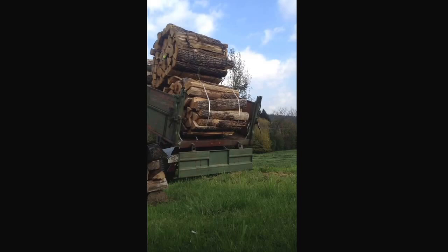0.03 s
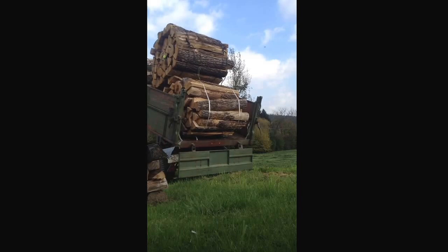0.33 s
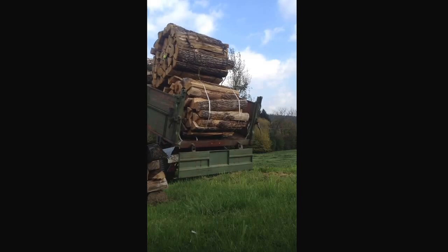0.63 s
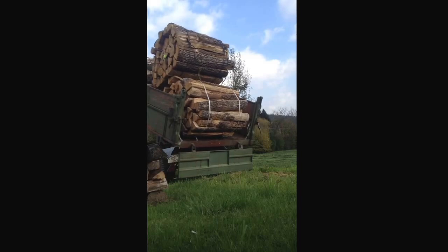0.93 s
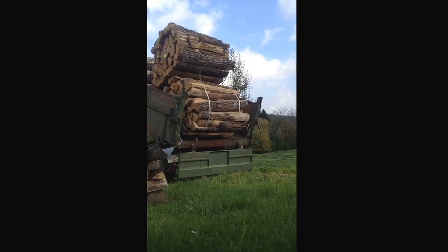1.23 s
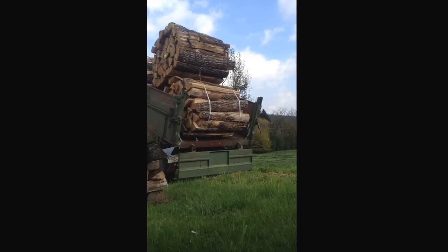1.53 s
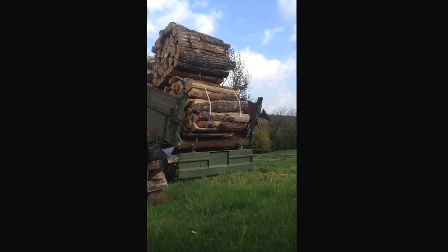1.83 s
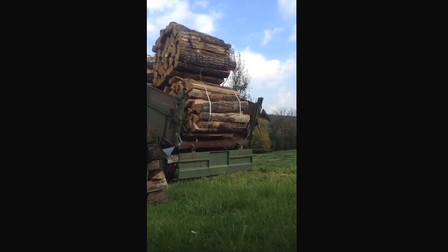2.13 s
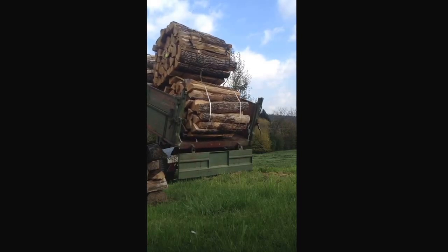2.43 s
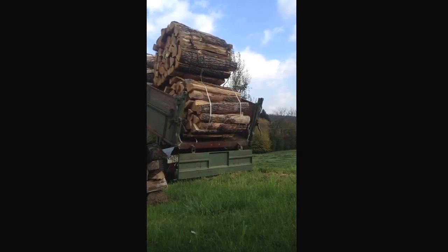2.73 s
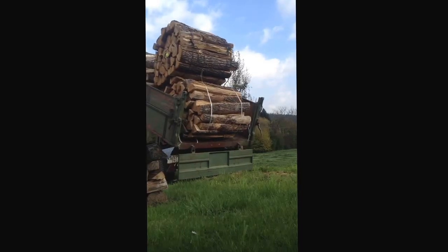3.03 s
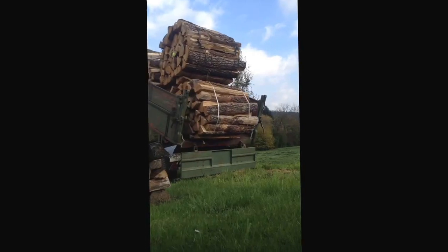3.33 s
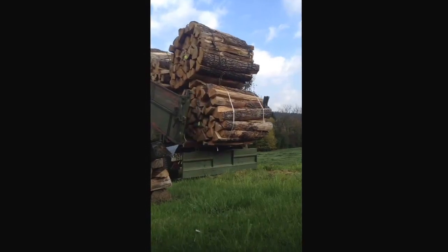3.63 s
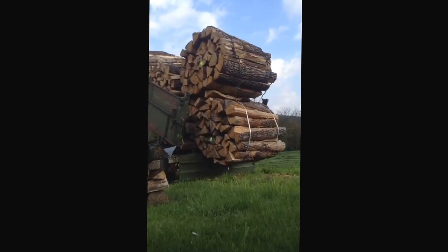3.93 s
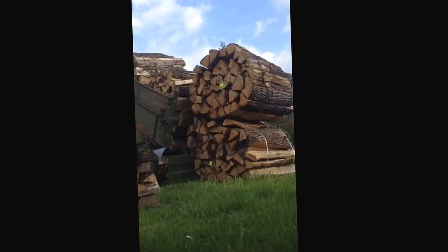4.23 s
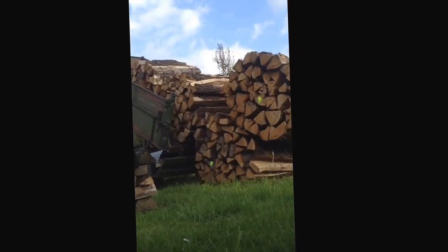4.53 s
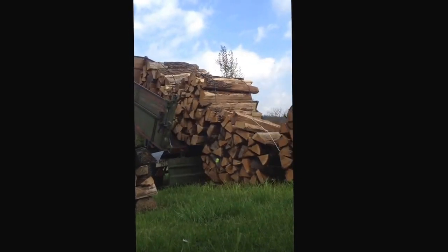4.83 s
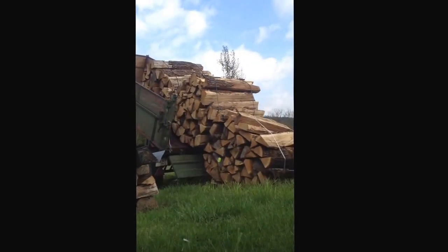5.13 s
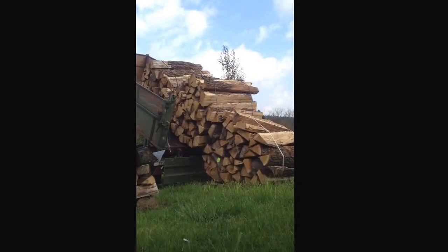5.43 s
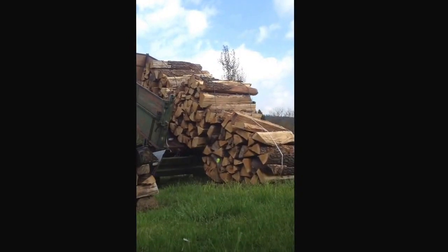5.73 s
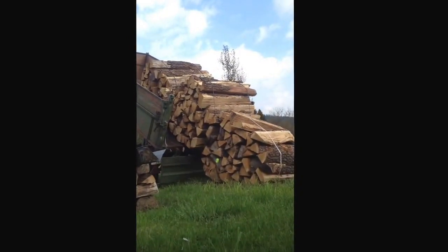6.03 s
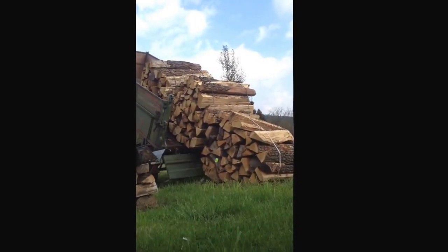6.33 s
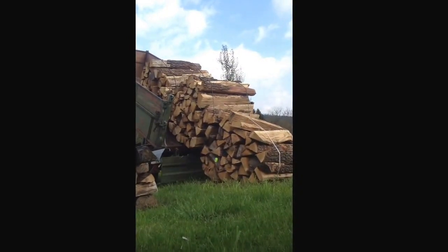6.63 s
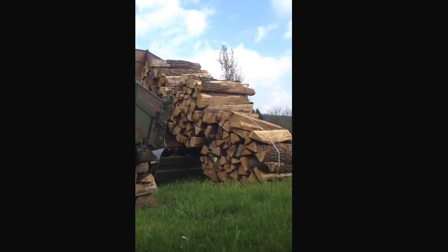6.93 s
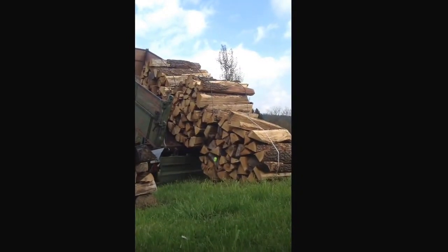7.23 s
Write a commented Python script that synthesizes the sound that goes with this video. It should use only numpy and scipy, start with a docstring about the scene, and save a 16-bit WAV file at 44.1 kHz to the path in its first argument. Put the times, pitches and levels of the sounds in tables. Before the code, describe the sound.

A tractor idles with a low, rattling hum in an open field. Bundles of firewood creep down a tipping steel trailer in small jerks, knocking and crackling. A sharp snap and a short scraping squeal set the load loose, and two bundles crash onto the grass in a loud, hollow clatter with splinters and dull thuds. The pile settles with scattered knocks and one last crack. The sound is dry, from one nearby microphone.

```python
"""A tractor idles in a field while its trailer tips bundles of split firewood onto the grass.
Three cylinders thump and rattle under the rush of the fan. The load creeps in jerks, knocking on the
steel bed and tearing bark, then breaks loose with a snap and a stick-slip squeal. Two bundles crash
down in a clatter of ringing logs, splinters and turf thuds; the pile settles and one last piece snaps."""
import sys
import numpy as np
from scipy import signal
from scipy.fft import rfft, irfft
from scipy.io import wavfile
from scipy.ndimage import uniform_filter1d

SR = 44100
rng = np.random.default_rng(int(sys.argv[2]) if len(sys.argv) > 2 else 0)


def wav_out(sig):
    """Save sig, one row per channel (or a flat mono array), as 16-bit PCM at SR to the path in sys.argv[1]."""
    wavfile.write(sys.argv[1], SR, np.round(np.clip(np.atleast_2d(sig).T, -1, 1) * 32767).astype(np.int16))


N = 321489
TIME = np.arange(N) / SR
HIT = TIME[:SR // 4]  # time axis of one hit

# jerks of the creeping load: t/s, knock peak/dB, crackle peak/dB, crackle swell/s
LOAD_SLIPS = [(0.028, -24.5, -30, 0.0047), (0.348, -25, -24.5, 0.0024), (0.362, -41, -21.5, 0.0021),
              (0.372, -23.5, -40, 0.0059), (0.651, -25.5, -30, 0.0046), (0.832, -31.5, -51, 0.0033),
              (0.915, -28, -27.5, 0.0027), (1.064, -29.5, -45, 0.0033), (1.184, -26, -26.5, 0.002),
              (1.371, -31, -47, .004), (1.484, -26.5, -27, 0.004), (1.543, -32.5, -37, .003),
              (1.991, -27, -46, .004), (2.003, -28.5, -28, 0.0031), (2.125, -28.5, -47, .002),
              (2.202, -28, -29, 0.0035), (2.291, -27.5, -30.5, 0.0032), (2.323, -29.5, -32, 0.0044),
              (2.414, -26.5, -31.5, 0.011), (2.519, -31, -34, 0.0062), (2.663, -26.5, -33, 0.0043),
              (2.767, -29.5, -39.5, 0.0055), (2.851, -43, -39, .003), (2.867, -31.5, -30, 0.0017),
              (2.95, -30, -31.5, 0.011), (2.964, -37, -34, .004), (2.978, -30, -27.5, 0.011),
              (3.002, -23, -31, .004), (3.014, -22, -21, 0.0044), (3.029, -24.5, -29, 0.0017),
              (3.138, -34, -25.5, .005), (3.18, -33, -24, 0.0039), (3.44, -34.5, -33.5, 0.0024),
              (3.739, -29, -22, 0.0045), (3.825, -46, -24.5, 0.0073), (3.886, -45, -24, 0.0047),
              (4.226, -24, -15.5, 0.014), (4.38, -31, -26, 0.0014), (6.079, -35, -59, 0.0038),
              (6.298, -49, -36.5, 0.0019), (7.244, -32, -43.5, 0.0077)]
# hollow tone of logs knocking together: f/Hz, level/dB
CLATTER_SPECTRUM = [(130, -34.5), (220, -7.5), (321, -5), (356, -0.5), (420, -3), (456, -2), (519, 3.5),
                    (602, -3), (809, -1), (1170, -18), (2000, -21.5), (2600, -14), (4400, -120)]
# bright tone of tearing bark and fibres: f/Hz, level/dB
BARK_SPECTRUM = [(100, -45), (590, -19), (1000, 3.5), (1290, -28), (1580, 1), (2130, -8.5), (2590, 4),
                 (3410, -11.5), (4440, -4.5), (5520, -2.5), (6950, -1), (9580, -8.5), (13500, -9),
                 (15500, -27)]
# dry tone of breaking chips: f/Hz, level/dB
SPLINTER_SPECTRUM = [(100, -51), (760, -22), (1300, -6.5), (1550, -5), (1950, -7), (2520, 1), (3140, -10),
                     (3480, -10.5), (3820, -9), (4610, -6.5), (5110, -13), (7120, -6.5), (9720, -14),
                     (11400, -13), (13500, -16), (15500, -27)]


def undb(db):
    """Decibels to gain."""
    return 10 ** (np.asarray(db) / 20)


def unit(x):
    """Scale to rms 1."""
    return x / np.sqrt(np.mean(x ** 2))


def peak(x, db):
    """Scale so that the loudest few milliseconds have this level."""
    return x * undb(db) / np.sqrt(uniform_filter1d(x ** 2, size=180).max())


def curves(rows):
    """Join timed rows by straight lines, one curve a column."""
    times, *columns = np.transpose(rows)
    return [np.interp(TIME, times, column) for column in columns]


def add(out, s, x):
    """Mix a sound in at time s."""
    i = max(int(s * SR), 0)
    out[i:i + len(x)] += x[:max(N - i, 0)]


def response(points, size=4096):
    """Minimum-phase impulse response from a spectrum of f/Hz, level/dB points."""
    hz, db = np.transpose(points)
    freq = np.maximum(np.fft.rfftfreq(size, 1 / SR), 1)
    gain = undb(np.interp(np.log(freq), np.log(hz), db))
    cepstrum = irfft(np.log(gain))
    cepstrum[1:size // 2] *= 2
    cepstrum[size // 2 + 1:] = 0
    return irfft(np.exp(rfft(cepstrum)))[:size // 2]


def through(x, impulse):
    """Pass a sound through an impulse response."""
    return signal.fftconvolve(x, impulse)[:len(x)]


def band(x, hz, width_hz):
    """One resonance, gain 1 at its centre."""
    return signal.lfilter(*signal.iirpeak(hz, hz / width_hz, SR), x)


def cut(x, hz, kind):
    """Fourth-order low-pass or high-pass."""
    return signal.sosfilt(signal.butter(4, hz, kind, fs=SR, output="sos"), x)


def walk(rate):
    """Smooth random modulation at rms 1, with about `rate` turns a second."""
    step = int(SR / rate)
    held = np.repeat(rng.standard_normal(N // step + 1), step)
    return unit(uniform_filter1d(held, step)[:N])


def sine(hz):
    """Oscillator that follows a pitch curve."""
    return np.sin(2 * np.pi * np.cumsum(hz) / SR)


def fade(t60):
    """Decay of one hit, 60 dB down after t60 seconds."""
    return undb(-60 * HIT / t60)


def burst(t60):
    """A decaying hit of white noise."""
    return rng.standard_normal(len(HIT)) * fade(t60)


def grains(count, rate, spread_db):
    """Random tiny impacts, `rate` a second; a few stand out, or drop back if the spread is negative."""
    chance, size, sign = rng.random(count), rng.exponential(size=count), rng.choice([-1, 1], count)
    return (chance < rate / SR) * sign * undb(spread_db * np.minimum(size, 4))


def steady(x, size):
    """Take out slow swells so that an envelope can play the sound."""
    power = uniform_filter1d(uniform_filter1d(x ** 2, size), size)
    return x / np.sqrt(power + 1e-4 * np.mean(x ** 2))


def ring(modes, scale=1, scatter_db=3):
    """Damped modes; each strike point weights them differently."""
    out = 0
    for hz, db, t60 in modes:
        weight = rng.choice([-1, 1]) * undb(db + scatter_db * rng.standard_normal())
        out += weight * fade(t60) * np.sin(2 * np.pi * hz * scale * HIT)
    return out


def envelope(s, attack_s, hold_s, t60):
    """Rise, hold and die away."""
    age = TIME - s
    return np.clip(age / attack_s, 0, 1) * undb(-60 * np.maximum(age - attack_s - hold_s, 0) / t60)


def engine(firing_hz=18.45, thump_db=-8, rattle_db=-3, ping_db=-17, hiss_db=-12, hum_wander=0.00837):
    """Three cylinders fire in turn: each thumps the exhaust, rattles and pings the casing over the fan."""
    # fader ride of the idle: t/s, level/dB
    idle_level = [(0, -38), (1.5, -37.5), (2.9, -36.5), (3.9, -35.5), (4.4, -37), (5.4, -42.5), (5.95, -43),
                  (6.5, -40.5), (7.29, -40)]
    # accent of each cylinder: level/dB
    cylinder_db = [0, 2, 2]
    # tone of the engine body: f/Hz, level/dB
    body_spectrum = [(21, -92), (35, -59), (97, -7.5), (338, -4), (578, -12), (847, -14), (915, -12.5),
                     (1040, -12.5), (1640, -20.5), (1770, -24.5), (2740, -24), (4560, -41), (6350, -37),
                     (7210, -24), (15500, -82)]
    # hum of the running machine: f/Hz, level against the engine/dB, flutter/dB
    hum_tones = [(183.2, -14, 1.5), (252, -13, 4.5), (337.8, -9.5, 4)]
    cycles = np.cumsum(firing_hz * (1 + 0.00592 * walk(3))) / SR
    # each cylinder shakes the machine in its own way, the same on every turn
    rattles = [burst(1.0) * (1 - np.exp(-HIT / 0.013)) for _ in cylinder_db]
    puffs, clanks = np.zeros(N), np.zeros(N)
    for k, i in enumerate(np.flatnonzero(np.diff(np.floor(cycles)))):
        cylinder = k % len(cylinder_db)
        puffs[i] = undb(cylinder_db[cylinder] + 2.5 * rng.standard_normal())
        add(clanks, i / SR, rattles[cylinder] * puffs[i])
    body = response(body_spectrum)
    thump = unit(cut(cut(through(puffs, body), 190, "low"), 96, "high"))
    rattle = unit(cut(cut(through(clanks, body), 1070, "low"), 156, "high"))
    ping = unit(band(rng.standard_normal(N) * through(puffs, fade(0.059)), hz=1034, width_hz=20))
    gas = rng.standard_normal(N) * (1 + 0.88 * np.exp(-(cycles % 1) / 0.37))  # surges at each firing
    rush = unit(through(gas - 0.5 * band(gas, 120, 56), body))
    sound = unit(rush + undb(thump_db) * thump + undb(rattle_db) * rattle + undb(ping_db) * ping)
    for hz, db, flutter_db in hum_tones:
        hum = sine(hz * (1 + hum_wander * walk(40)))
        sound += undb(db) * unit(hum * undb(flutter_db * walk(18)))
    hiss = unit(band(rng.standard_normal(N), 5600, 4900)) * undb(hiss_db)
    return (sound + hiss) * undb(curves(idle_level)[0])


def bed_knocks(judder_db=-13, logs_db=-1, lead_s=0.0055):
    """Each slip judders and rings the steel bed just before the bark gives; the logs knock dully."""
    # modes of the steel bed: f/Hz, level/dB, t60/s
    bed_modes = [(542, 4, 0.16), (592, -3, 0.1), (701.5, 1, 0.11), (751, -1.5, 0.057), (850, -3, 0.069),
                 (921, -3.5, 0.12), (1018, -11, 0.15), (1204, -19, 0.15), (1427, -17, .14)]
    out, wood = np.zeros(N), response(CLATTER_SPECTRUM)
    onset = 1 - np.exp(-HIT / 0.003)
    for s, db, _, _ in LOAD_SLIPS:
        push = undb(judder_db) * burst(0.071) * onset
        push[0] += 1  # the jolt ahead of the judder
        bed = ring(bed_modes, scale=1 + 0.0072 * rng.standard_normal(), scatter_db=3.5)
        steel = cut(through(push, bed), 248, "high")
        logs = cut(through(burst(0.16) * onset, wood), 186, "high")
        add(out, s - lead_s, peak(unit(steel) + undb(logs_db) * unit(logs), db))
    return out


def bark_crackles(tail_db=-9, tail_t60=0.19, own_ring_db=3, pitch_scatter=0.038):
    """Each slip tears a shower of fibres that rings the splinters and one pitch of its own."""
    # splinter resonances: f/Hz, width/Hz, level/dB
    splinter_rings = [(4420, 130, 4), (7210, 166, 9)]
    out, bark = np.zeros(N), response(BARK_SPECTRUM)
    for s, _, db, swell_s in LOAD_SLIPS:
        age = HIT / swell_s
        detune = 1 + pitch_scatter * rng.standard_normal()
        tearing = age * np.exp(1 - age) + undb(tail_db) * fade(tail_t60) * (1 - np.exp(-age))
        shower = through(grains(len(HIT), rate=2200, spread_db=2.5) * tearing, bark)
        rings = sum(undb(ring_db + rng.standard_normal()) * band(shower, hz * detune, width_hz)
                    for hz, width_hz, ring_db in splinter_rings)
        own_ring = band(shower, rng.uniform(2400, 8300), 210)
        add(out, s, peak(shower + rings + undb(own_ring_db) * own_ring, db))
    return out


def stick_cracks(tear_db=-5, scatter_db=-29):
    """A stick gives way in an instant: a sharp tear, its own short ring and a faint scatter off the stack."""
    # single sticks and fibres cracking: t/s, peak/dB, pitch/Hz
    cues = [(0.036, -57, 2640), (0.659, -38, 2620), (1.187, -52, 4280), (2.005, -26.5, 7250),
            (2.293, -32, 4440), (2.329, -30, 4420), (2.54, -37, 4500), (2.996, -20, 2710),
            (3.029, -20.5, 1700), (3.827, -27, 3600), (3.891, -32, 2110), (3.913, -28, 1500),
            (3.929, -29, 2900), (3.968, -28, 2400), (4.0599, -17, 2220), (4.078, -22.5, 1700),
            (4.103, -26, 2490), (4.1505, -27, 2530), (4.169, -14.5, 2350), (4.184, -18, 4400),
            (4.199, -17.5, 2740), (4.258, -21, 4500), (4.306, -25, 3300), (4.321, -26, 2500),
            (4.227, -15.5, 3870), (4.246, -20, 4460), (4.292, -16, 6800), (4.659, -31, 2630),
            (4.8234, -29, 2070), (4.851, -21, 1510), (4.86, -15.5, 1900), (4.87, -23, 1447),
            (4.894, -21, 2040), (4.902, -27, 1550), (4.916, -18.5, 2200), (5.149, -31, 2440),
            (5.168, -24, 2600), (5.336, -37, 2530), (5.386, -41, 3530), (5.705, -42, 2580),
            (5.768, -31, 2380), (5.787, -30, 2670), (5.815, -36.5, 4126), (6.207, -32.5, 2500),
            (6.244, -38.5, 4530), (6.485, -39.5, 2520), (6.554, -39, 7800), (6.642, -43, 4490),
            (6.937, -16, 2370)]
    # modes of a stick: multiple of its pitch, level/dB, t60/s
    stick_modes = [(.88, -6.5, 0.0088), (1, 2, 0.0087), (1.09, -2.5, 0.01), (1.61, -7, 0.0092),
                   (2.2, -28, .01)]
    out, bark = np.zeros(N), response(BARK_SPECTRUM)
    for s, db, hz in cues:
        push = undb(scatter_db) * burst(0.079)
        push[0] += 1
        stick = cut(through(push, ring(stick_modes, hz, scatter_db=1.5)), 410, "high")
        tear = cut(through(burst(0.011), bark), 0.52 * hz, "high")
        add(out, s, peak(unit(stick) + undb(tear_db) * unit(tear), db))
    return out


def wood_snaps(tail_db=-19, rise_s=0.00024, body_db=-4, overtone_ratio=1.57, overtone_db=-5):
    """A piece breaks with a thump, rings briefly at two pitches and scatters off the stack."""
    # breaks: t/s, peak/dB, t60/s, low cut/Hz, ring/Hz, ring/dB, body trim/dB, body low cut/Hz
    cues = [(2.995, -7.5, 0.039, 890, 2880, -9, -3.5, 130), (6.936, -23.5, 0.01, 1800, 2620, 6, -1, 220)]
    # sharp crack of the breaking piece: f/Hz, level/dB
    crack_spectrum = [(100, -47), (700, -22), (1200, -16), (1650, 9.5), (2050, -5), (2700, 9.5), (3150, 0),
                      (3900, -5), (5300, 2.5), (7200, 7), (8800, -2), (13000, -1), (15500, -41)]
    # dull thump of its body: f/Hz, level/dB
    body_spectrum = [(40, -40), (110, -8), (220, -5.5), (350, -8.5), (560, 4.5), (680, -5), (900, -0.5),
                     (1200, -24), (3000, -18.5)]
    out = np.zeros(N)
    for s, db, t60, low_cut_hz, hz, ring_db, trim_db, body_cut_hz in cues:
        shape = (fade(t60) + undb(tail_db) * fade(0.2)) * (1 - np.exp(-HIT / rise_s))
        fracture = rng.standard_normal(len(HIT)) * shape
        crack = cut(through(fracture, response(crack_spectrum)), low_cut_hz, "high")
        rings = band(crack, hz, 430) + undb(overtone_db) * band(crack, overtone_ratio * hz, 550)
        body = cut(through(burst(0.11), response(body_spectrum)), body_cut_hz, "high")
        add(out, s, peak(crack + undb(ring_db) * rings, db) + peak(body, db + body_db + trim_db))
    return out


def sliding_squeal(waver=0.012, chatter_db=3, rasp_db=4, stutter_db=2):
    """Stick-slip friction: a rising squeal breaks up into scraping and catches again, lower and hoarse."""
    # path of the sliding wood: t/s, pitch/Hz, squeal/dB, scrape/dB, roughness as a share of the pitch
    slide = [(3.035, 1930, -42, -45, 0.029), (3.052, 1990, -32, -42, .02), (3.07, 2310, -32, -40, .02),
             (3.086, 2490, -31, -29, .02), (3.105, 2550, -52, -25, .1), (3.124, 2150, -37, -26.5, .08),
             (3.141, 1615, -26.5, -28, 0.038), (3.156, 1602, -30.5, -36, 0.064),
             (3.172, 1772, -30, -45, 0.054), (3.184, 2545, -31, -31, .12), (3.2, 2580, -39, -42, 0.17),
             (3.25, 2580, -53, -53, 0.17)]
    # partials of the squeal: multiple of the pitch, level/dB
    partials = [(1, 0), (1.79, -5), (2.08, -10), (3, -6.5)]
    hz, squeal_db, scrape_db, roughness = curves(slide)
    tone = 0
    for ratio, db in partials:
        pitch = ratio * hz * (1 + roughness * walk(1500) + waver * walk(300))
        tone += undb(db + chatter_db * walk(260)) * sine(pitch)
    slips = grains(N, rate=3700, spread_db=-2)
    bark = unit(through(slips, response(BARK_SPECTRUM)))
    rasp = unit(band(slips, 7400, 2600))
    scrape = unit(bark + undb(rasp_db) * rasp)
    friction = unit(tone) * undb(squeal_db) + scrape * undb(scrape_db)
    sliding = (TIME > slide[0][0]) & (TIME < slide[-1][0])
    return friction * undb(stutter_db * walk(98)) * sliding


def squeaks(whistle_hz=7150, sag_hz_per_s=970, whistle_rough=0.019, undertone_hz=5510, undertone_db=-8):
    """Logs rub in the bundles in brief, unsteady glides; a high whistle recurs over a weaker tone."""
    # thin squeaks: t/s, length/s, start/Hz, end/Hz, peak/dB, roughness as a share of the pitch
    rubs = [(3.187, 0.041, 8400, 8600, -34, .012), (3.602, 0.07, 1700, 1820, -41.5, 0.06),
            (3.67, 0.044, 5150, 5900, -38.5, 0.14), (3.886, 0.15, 7450, 8400, -35, 0.028),
            (3.944, 0.049, 6100, 4900, -31, 0.073), (3.977, 0.014, 1070, 1070, -19.5, 0.12),
            (4.06, 0.069, 4820, 5900, -31, 0.095)]
    # high whistles: t/s, length/s, peak/dB
    whistles = [(4.583, 0.067, -29.5), (4.686, 0.12, -36), (6.095, 0.074, -42), (6.747, 0.065, -44)]
    out, jitter, grip = np.zeros(N), walk(2000), undb(2.7 * walk(200))
    glides = list(rubs)
    for s, length, db in whistles:
        glides.append((s, length, whistle_hz, whistle_hz - sag_hz_per_s * length, db, whistle_rough))
        glides.append((s, length, undertone_hz, undertone_hz, db + undertone_db, whistle_rough))
    for s, length, start_hz, end_hz, db, roughness in glides:
        i, n = int(s * SR), int(length * SR)
        pitch = np.linspace(start_hz, end_hz, n) * (1 + roughness * jitter[i:i + n])
        add(out, s, peak(np.hanning(n) * grip[i:i + n] * sine(pitch), db))
    return out


def agitation(settle_db=-15.5, settle_t60=3.26, thud_sag_db_per_s=53):
    """Envelopes of clatter, splinters and thud: each fall swells, holds and leaves the pile rattling."""
    # logs slide, land or shift: t/s, attack/s, hold/s, release t60/s, clatter/dB, splinters/dB, thud/dB
    falls = [(3.297, 0.7, .05, 0.26, -38, -51, -55), (3.812, 0.046, 0.16, 0.51, -24.5, -32.5, -29.5),
             (4.044, 0.013, 0.031, 0.6, -23.5, -29, -17), (4.14, 0.033, 0.039, 0.46, -8.5, -17.5, -14.5),
             (4.276, 0.02, 0.047, 0.41, -24, -28.5, -23.5), (4.424, 0.15, 0.031, 0.35, -30, -37, -54),
             (4.747, 0.017, 0.022, 0.23, -25, -41, -47.5), (4.817, 0.028, 0.034, 0.33, -16.5, -23.5, -20),
             (5.162, 0.005, 0.016, 0.2, -28.5, -37, -33), (5.285, 0.048, 0.18, 0.39, -36, -40.5, -50),
             (5.548, 0.15, 0.074, 0.37, -36, -39.5, -40), (6.027, 0.083, 0.26, 0.45, -42, -50, -75)]
    power = np.zeros((3, N))
    for s, attack_s, hold_s, t60, clatter_db, splinter_db, thud_db in falls:
        settling = undb(settle_db) * envelope(s, attack_s, hold_s, settle_t60)
        motion = np.maximum(envelope(s, attack_s, hold_s, t60), settling)
        # the weight lands first, so the thud sinks while the clatter holds
        sag_db = thud_sag_db_per_s * np.clip(TIME - s - attack_s, 0, hold_s)
        power += np.square([motion * undb(db) for db in (clatter_db, splinter_db, thud_db - sag_db)])
    return np.sqrt(power)


def splintering(chip_rate=280, chip_t60=0.0161, scatter_db=-6, stick_rate=45, stick_db=-7):
    """Chips of many sizes break and scatter off the stack; thin sticks tick at pitches of their own."""
    energy_decay = fade(chip_t60) ** 2 + (undb(scatter_db) * fade(0.13)) ** 2
    # some breaks reach all bands at once, others only one
    wide_breaks = grains(N, rate=0.77 * chip_rate, spread_db=3) ** 2
    chips, sticks = 0, 0
    for hz in np.geomspace(1400, 13000, 10):
        narrow_breaks = grains(N, rate=chip_rate, spread_db=4.5) ** 2
        energy = np.abs(through(wide_breaks + narrow_breaks, energy_decay))
        chips += band(np.sqrt(energy) * rng.standard_normal(N), hz, hz / 4)
    for hz in np.geomspace(1300, 7500, 20):
        sticks += band(grains(N, rate=stick_rate, spread_db=2), hz * rng.uniform(0.99, 1.04), 124)
    return through(unit(chips) + undb(stick_db) * unit(sticks), response(SPLINTER_SPECTRUM))


def log_tumble(log_count=36, knock_rate=11, clatter_trim_db=-3.5, splinter_trim_db=-1, thud_trim_db=-2):
    """Logs of many lengths knock together, bark splinters between them and the turf thuds."""
    # bending modes of a split log: multiple of the lowest, level/dB, t60/s
    log_modes = [(1, -2, .06), (1.3, 3, 0.012), (2.7, 1.5, 0.056), (3.5, 0.5, 0.029), (5.3, -26, 0.074)]
    # dull tone of wood landing on turf: f/Hz, level/dB
    thud_spectrum = [(25, -68), (60, -61), (85, -37), (115, -19.5), (150, -5.5), (210, -2), (270, -3),
                     (340, -1), (500, -63), (900, -75)]
    knocking, breaking, landing = agitation()
    logs = sum(through(grains(N, rate=knock_rate, spread_db=1), ring(log_modes, hz))
               for hz in np.geomspace(215, 900, log_count))
    clatter = steady(through(logs, response(CLATTER_SPECTRUM)), size=2000) * knocking
    splinters = steady(splintering(), size=2000) * breaking
    turf = through(grains(N, rate=450, spread_db=3), response(thud_spectrum))
    thud = steady(turf, size=1400) * landing
    return clatter * undb(clatter_trim_db) + splinters * undb(splinter_trim_db) + thud * undb(thud_trim_db)


def log_blows(contact_s=0.00085, bundle_db=-5, neighbours_db=-8, bundle_t60_ratio=4, knock_trim_db=1):
    """A log lands hard with a dry click; its neighbours knock and the bundle rings, damped by the weight."""
    # heavy landings: t/s, level/dB, pitch/Hz, t60/s, click against that level/dB
    cues = [(3.737, -32.5, 407, 0.049, 5), (3.912, -20.5, 517, 0.049, -15),
            (3.928, -21.5, 510, 0.057, -5.5), (3.981, -20.5, 576, 0.046, -16),
            (4.056, -11.5, 514, 0.089, -27), (4.066, -16, 380, .04, -10), (4.076, -18.5, 625, .06, -15),
            (4.102, -19, 450, .06, -20), (4.141, -13, 443, 0.1, -14), (4.151, -13.5, 445, 0.092, -24),
            (4.158, -11, 210, .1, -26), (4.168, -10, 384, .06, -9), (4.182, -10.5, 504, 0.13, -11),
            (4.2, -11, 230, .1, -23), (4.204, -7.5, 422, 0.086, -19), (4.215, -7, 502, 0.14, -14),
            (4.2503, -7, 514, 0.05, -24), (4.261, -24, 332, 0.062, -22), (4.279, -14, 448, 0.059, -20),
            (4.304, -16.5, 543, 0.059, -4), (4.385, -23, 418, .04, -17), (4.42, -25, 333, 0.031, -23),
            (4.66, -23, 567, 0.054, -2), (4.669, -26, 405, 0.032, -21), (4.702, -26, 430, 0.052, -19),
            (4.7505, -22.5, 560, 0.065, -11.5), (4.768, -22.5, 616, 0.087, -15),
            (4.8213, -20, 626, .04, -20), (4.832, -9.5, 493, 0.07, -23), (4.85, -13, 318, 0.056, -14),
            (4.862, -9, 712, 0.048, -17), (4.873, -15, 546, 0.044, -21), (4.886, -7.5, 560, 0.033, -24),
            (4.896, -4, 520, 0.032, -24), (4.906, -7.5, 420, 0.032, -30), (4.920, -11.5, 480, 0.02, -29),
            (4.9302, -7, 530, 0.017, -39), (4.941, -20, 420, 0.093, -27), (4.957, -26, 596, 0.062, -7),
            (4.974, -26, 300, 0.081, -7), (4.995, -23.5, 460, 0.051, -9.5), (5.094, -29, 517, 0.058, -19.5),
            (5.171, -25.5, 414, 0.086, -18), (5.222, -28, 397, 0.042, -19), (5.35, -27, 658, 0.11, -23),
            (5.767, -28.5, 464, 0.084, -11), (6.206, -28, 457, 0.088, -17)]
    # modes of a struck log held by its neighbours: multiple of its pitch, level/dB, share of its t60
    log_modes = [(.62, -5.5, 1), (1, 3, 0.86), (1.5, -8, 0.92), (4.6, -28, 0.9)]
    # modes of a tied bundle and the bed under it: f/Hz, level/dB, t60 before damping/s
    bundle_modes = [(157, -23, 0.19), (265, -18, 0.12), (316.5, 0, 0.37), (434, 5.5, 0.17),
                    (496, -2.5, 0.2), (634, -1.5, 0.29), (776, -5, 0.33), (861.6, -5, 0.51),
                    (837, -16, 0.079), (1366, -21, 0.11), (1553, -14, 0.19), (2470, -15, 0.18),
                    (2660, -29, 0.096)]
    out, wood, chip = np.zeros(N), response(CLATTER_SPECTRUM), response(SPLINTER_SPECTRUM)
    contact = 1 - np.exp(-(HIT / contact_s) ** 2)
    for s, db, hz, t60, click_db in cues:
        modes = [(ratio, mode_db, share * t60) for ratio, mode_db, share in log_modes]
        log = unit(ring(modes, hz, scatter_db=0.5) * contact)
        bundle = unit(ring(bundle_modes, scatter_db=4.5) * fade(bundle_t60_ratio * t60) * contact)
        neighbours = unit(through(burst(t60), wood))
        knock = cut(log + undb(bundle_db) * bundle + undb(neighbours_db) * neighbours, 145, "high")
        click = through(burst(0.044), chip)
        click += band(click, rng.uniform(1540, 5900), 270)
        add(out, s, peak(knock, db + knock_trim_db) + peak(click, db + click_db))
    return out


def scene():
    """Open field: every source reaches the microphone directly, in mono."""
    tractor = engine()
    creeping = bed_knocks() + bark_crackles() + stick_cracks()
    breaking_loose = wood_snaps() + sliding_squeal() + squeaks()
    crashing = log_tumble() + log_blows()
    return (tractor + creeping + breaking_loose + crashing)[None]


def record(dry, top_hz=15500):
    """The phone colours the treble, rounds the loudest peaks and cuts the top."""
    # small resonances and bass loss of the microphone port: f/Hz, level/dB
    port_spectrum = [(30, -1), (70, -3), (110, -4), (3900, -2.5), (4700, 1), (4900, -6), (5060, -8),
                     (5500, -6), (6700, -6), (7200, -7), (7900, -8.5), (15000, -11)]
    rounded = np.tanh(through(dry[0], response(port_spectrum)))
    low_pass = signal.ellip(8, 0.2, 70, top_hz, fs=SR, output="sos")
    return signal.sosfilt(low_pass, rounded)[None]


dry = scene()
out = record(dry)
wav_out(out)
```